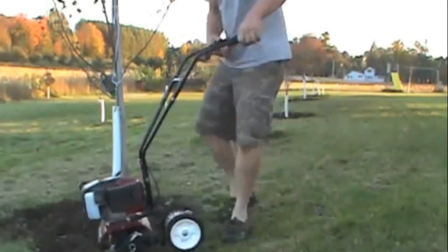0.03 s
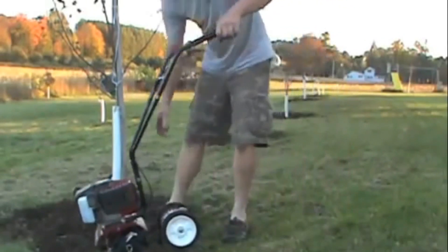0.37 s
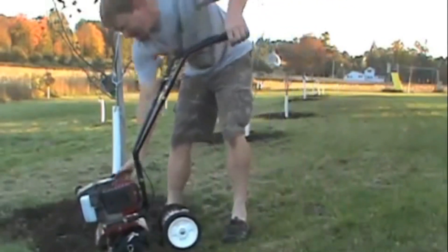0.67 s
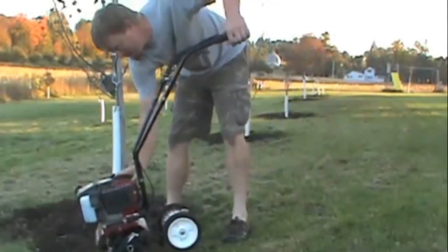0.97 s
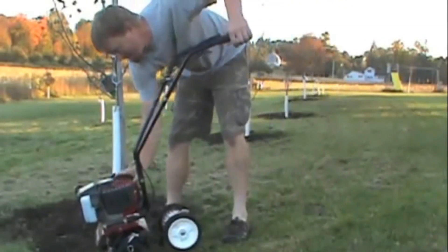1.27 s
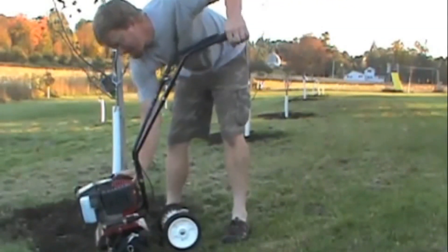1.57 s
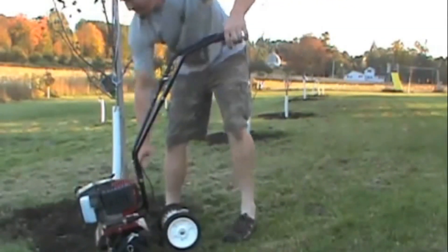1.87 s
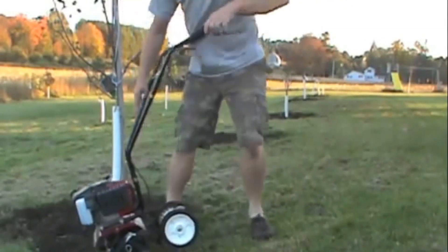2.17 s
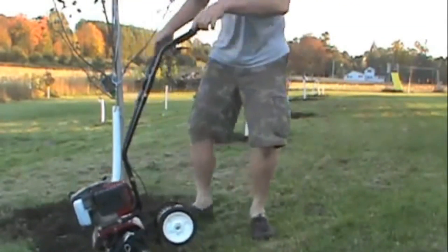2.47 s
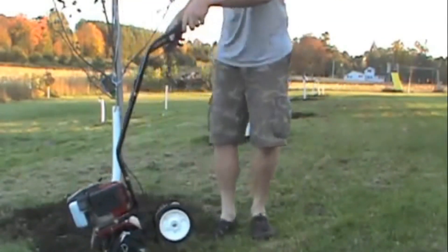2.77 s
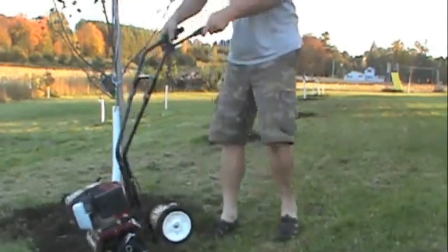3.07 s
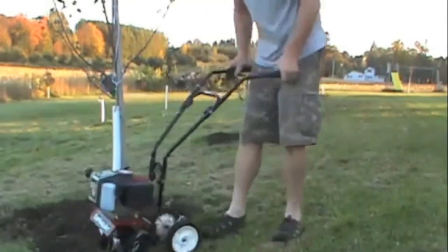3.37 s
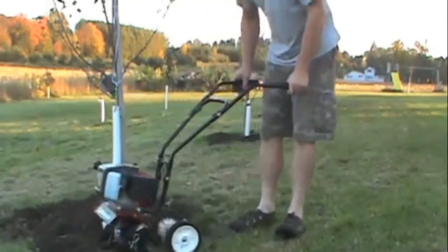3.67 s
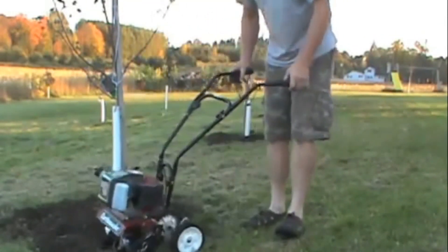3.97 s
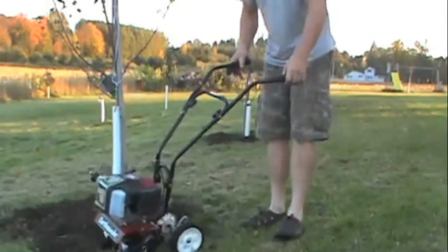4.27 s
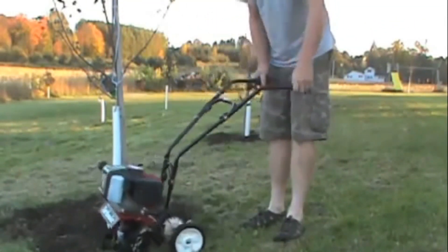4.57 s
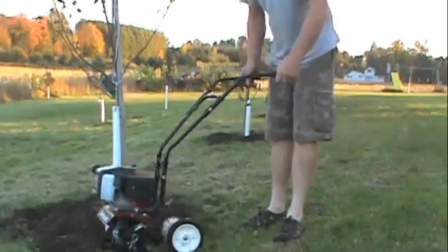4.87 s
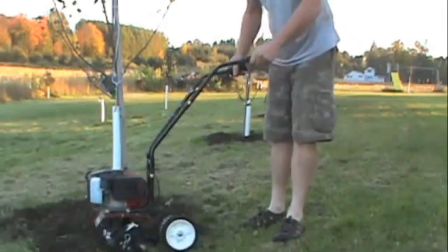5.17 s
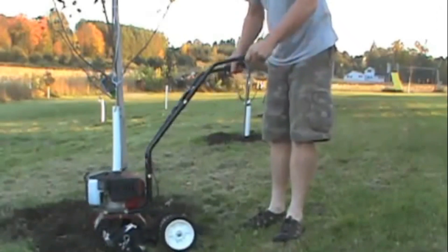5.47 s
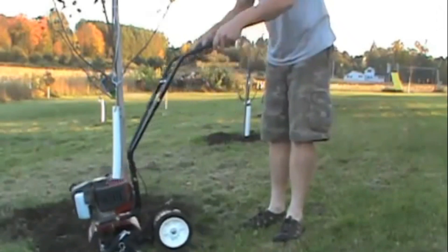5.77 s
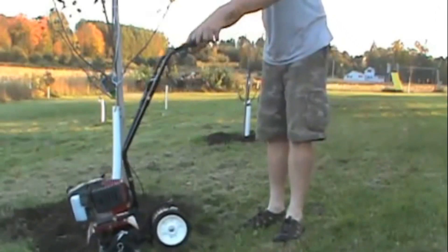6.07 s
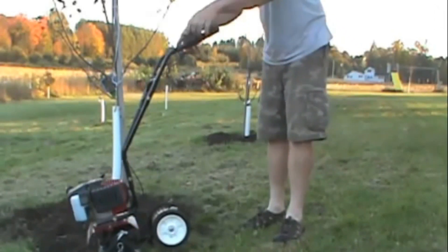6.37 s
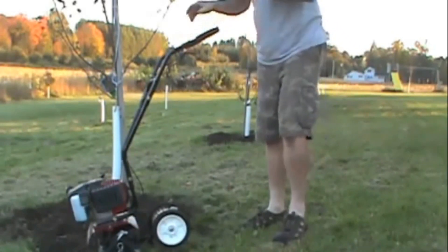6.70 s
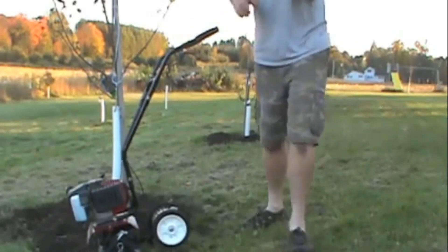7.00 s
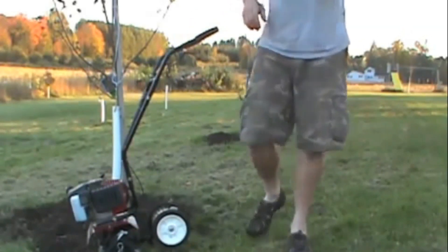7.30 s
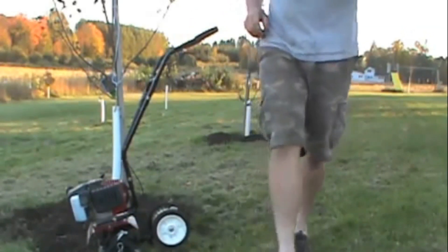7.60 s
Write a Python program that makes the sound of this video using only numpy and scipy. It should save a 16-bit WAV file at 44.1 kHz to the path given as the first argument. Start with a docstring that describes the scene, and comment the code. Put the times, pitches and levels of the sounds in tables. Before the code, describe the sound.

A small petrol tiller runs fast, then sputters to a stop; metal parts click and knock as it is dragged through soil, then faint footsteps.

```python
"""On a lawn, a small petrol tiller runs fast and unevenly, its firings barking through the silencer.
Switched off, it chugs to a stop on its last compressions, with a dry squeak and a last kick.
It is dragged back through crumbling soil, loose steel parts click and the tine guard knocks;
then someone steps away, shoes brushing the grass. Far engines and tyres murmur behind."""
import sys
import numpy as np
from scipy import signal
from scipy.fft import rfft, irfft
from scipy.io import wavfile
from scipy.ndimage import uniform_filter1d

SR = 44100
rng = np.random.default_rng(int(sys.argv[2]) if len(sys.argv) > 2 else 0)


def inscribe(sig):
    """Save sig as 16-bit PCM at rate SR to the path in sys.argv[1].

    A 1-D sig is mono; a 2-D sig holds one channel per row.
    Samples are clipped to [-1, 1] before scaling.
    """
    pcm = np.round(np.clip(np.atleast_2d(sig).T, -1, 1) * 32767)
    wavfile.write(sys.argv[1], SR, pcm.astype(np.int16))


N = 345788
TIME = np.arange(N) / SR


# time_s, strokes_per_s
CRANK_SPEED = [(0, 69.5), (.12, 69.8), (.3, 72), (.45, 72.5), (.7, 72.4), (.95, 73.3), (1.2, 75),
               (1.38, 74), (1.5, 70.5), (1.6, 64.5), (1.7, 55), (1.77, 48.5), (1.85, 41.5), (1.92, 38),
               (1.986, 32)]

def crank():
    """Stroke rate and running stroke count, which reaches zero at the last quick stroke."""
    speed, = in_time(CRANK_SPEED)
    count = np.cumsum(speed) / SR
    return speed, count - np.interp(CRANK_SPEED[-1][0], TIME, count)


# time_s, level_db, firing_strength_0_1
COMBUSTION = [(0, -2, 0.91), (.3, -3.5, 0.72), (.55, -3, 0.91), (.9, -4, 0.96), (1.42, -3, 0.83),
              (1.52, -1.5, 0.1), (1.75, -3, 0.09), (2.0, 1.5, 0.03)]

def strokes(jitter_s=.00012, stumble_s=.0015, miss_share=.3, slip_share=.55):
    """Lightly loaded, the engine fires in short runs, misses, and often slips half a stroke."""
    speed, count = crank()
    countdown = np.arange(int(-count[0]))
    build_up, stumble, jitter = rng.standard_normal((len(countdown), 3)).T
    # spent gas builds up until a stroke fails to light
    spent_gas = np.cumsum(np.clip(miss_share * (1 + .35 * build_up), .05, .6))
    missed = np.diff(np.floor(spent_gas), prepend=0) > 0
    lit = in_time(COMBUSTION, np.interp(-countdown, count, TIME))[1] > .5
    slips = missed & lit & (rng.random(len(countdown)) < slip_share)
    position = -countdown - .5 * np.cumsum(slips) + .25 * slips
    keep = position > count[0]
    times = np.interp(position, count, TIME)
    firing = in_time(COMBUSTION, times)[1]
    times += firing * (jitter_s * jitter + stumble_s * missed * stumble)
    return times[keep], np.interp(times, TIME, speed)[keep], (firing * ~missed)[keep]


# pitch_hz, width_hz, gain_db
SILENCER_RESONANCES = [(80, 57, -18), (172, 63, 4.5), (301, 112, 1), (376, 160, -7), (467, 28, 5),
                       (540, 120, 3.5), (930, 250, 4.5), (1087, 121, 4.5), (1493, 62, -23)]

def exhaust(times, speed, fired, round_trip_s=.004562, jitter_s=.00025):
    """Firings crack, spit hot gas and bounce once through the silencer; misses mostly pump air."""
    level_db, power = in_time(COMBUSTION, times)
    size_dev, trip_dev, bark_dev, bounce_dev, length_dev = rng.standard_normal((len(times), 5)).T
    size = from_db(level_db + .8 * size_dev)
    bounce_s = times + round_trip_s + jitter_s * power * trip_dev
    bark = size * (fired * from_db(.5 + 1.1 * bark_dev) + (1 - fired) * from_db(-7))
    bounce = from_db(np.minimum(-8 + 2 * bounce_dev, -4))
    blows = impulses(times, bark) + impulses(bounce_s, bark * bounce)
    turbulence = decays(times, to_db(bark * (.5 + .5 * fired)) - 29, t60_s=.05) * rng.standard_normal(N)
    ringing = from_db(17.5) * resonate(blows + turbulence, SILENCER_RESONANCES)
    crack = from_db(15) * port_crack(times - .0002, size * (1 - power + .68 * fired))
    muffled = signal.sosfilt(signal.butter(3, 1900, fs=SR, output="sos"), ringing + crack)

    puff_s = .002915 * (65 / speed) ** .27 * (1 - .038 * power) * (1 + .059 * length_dev)
    pumped = size * (from_db(-10) * (1 - fired) + from_db(-24) * fired)
    air = puffs(times + .00036, pumped, puff_s, width=.59, skew_rad=.2)
    air += puffs(times + 1.23 * puff_s, from_db(-4.5 + 3 * power) * pumped, puff_s, width=1)
    air += puffs(times + 2.032 * puff_s, from_db(-7 + 3 * power) * pumped, puff_s, width=.35)
    air += puffs(bounce_s + .00031, from_db(-18) * size * fired, puff_s, width=.27)
    spit = decays(times, to_db(size * fired) - 30.5, t60_s=.015)
    return muffled + air + spit * (noise(1700, 2400) + from_db(-2) * noise(5400, 13000))


def port_crack(times, sizes, gap_s=.00074):
    """The exhaust port opens with a double crack, whose spacing hollows the middle tones."""
    cracks = impulses(times, sizes) + impulses(times + gap_s, .7 * sizes)
    return band(cracks, 670, 1690)


def puffs(times, sizes, periods_s, width, skew_rad=0):
    """Air pumped through a port: suck, push, suck."""
    out, t = np.zeros(N), np.arange(-SR // 50, SR // 50) / SR
    for s, size, period_s in zip(times, sizes, periods_s):
        if s + t[0] > 0:
            window = np.exp(-(t / period_s / width) ** 2)
            add(out, s + t[0], size * window * np.cos(2 * np.pi * t / period_s + skew_rad))
    return out


# stroke_harmonic, level_db, honk_gain_db
DRONE_HARMONICS = [(1, -57, 11), (2, -48.5, 9), (4, -31, 2), (5, -30.5, -7), (6, -30, 3.5),
                   (8, -43.5, 13.5), (9, -42.5, 12.5), (11, -36.5, 8), (12, -43, 2), (15, -33, 1.5),
                   (20, -35.5, 0)]

def drone():
    """The even part of the firing: wavering harmonics, most of which swell as the intake honks."""
    count = crank()[1]
    level_db, firing = in_time(COMBUSTION)
    honk = swell(start_s=.42, length_s=.27, db=0, attack_s=.02, release_s=.094)
    tones = 0
    for harmonic, db, honk_db in DRONE_HARMONICS:
        gain = from_db(db + honk * honk_db + 1.8 * drift(11))
        tones += gain * np.cos(2 * np.pi * harmonic * count + .42 * drift(7))
    ignition = np.interp(TIME, [1.42, 1.6], [1, 0])
    return np.sqrt(2) * from_db(level_db) * firing ** .99 * ignition * tones


# stroke_harmonic, level_db
WHIR_HARMONICS = [(4, -36), (5, -32.5), (6, -38.5), (7, -35.5), (16, -42), (18, -37), (20, -38.5),
                  (23, -38.5)]

def whir():
    """With the spark cut, the crank coasts and its harmonics glide down."""
    count = crank()[1]
    tones = sum(from_db(db + 1.5 * drift(11)) * np.cos(2 * np.pi * harmonic * count)
                for harmonic, db in WHIR_HARMONICS)
    return np.sqrt(2) * swell(start_s=1.463, length_s=.2, db=0, attack_s=.029, release_s=.095) * tones


# start_s, level_db, period_s, hiss_db
LAST_COMPRESSIONS = [(2.019, -15, 0.0043, -27), (2.027, -7.5, 0.005, -37), (2.058, -7, 0.0052, -29),
                     (2.099, -9.5, 0.0052, -25.5), (2.138, -10, 0.0061, -25), (2.198, -9, 0.0071, -25.5),
                     (2.269, -11.5, 0.00585, -28.5), (2.346, -14.5, 0.005, -34), (2.542, -11, 0.004, -26),
                     (2.58, -19, 0.0091, -39)]
# start_s, length_s, level_db
PISTON_SIGHS = [(2.29, 0.017, -33.5), (2.41, 0.022, -41), (2.478, 0.043, -42.5)]

def run_down():
    """The piston labours, rocks and kicks back; air sighs and rings hollow in the silencer."""
    s, db, period_s, hiss_db = np.transpose(LAST_COMPRESSIONS)
    air = puffs(s, from_db(db), period_s, width=.49, skew_rad=.42)
    air += puffs(s + 2.183 * period_s, from_db(db - 6), period_s, width=.16, skew_rad=.79)
    air += from_db(17.5) * port_crack(s, from_db(db) * (s < 2.15))
    sighs = swells(PISTON_SIGHS, attack_s=.0051, release_s=.0037)
    ring = uniform_filter1d(decays(s, .5 * db - 14.5, t60_s=.061), SR // 200)
    hollow = (ring + sighs) * noise(206, 394)
    leak = uniform_filter1d(decays(s - .004, hiss_db, t60_s=.065), SR // 250)
    leak *= noise(710, 1770) + from_db(-6) * noise(2880, 14000)
    return band(air, 110, 4000, order=1) + hollow + leak


# pitch_hz, level_db, t60_s
CASING_MODES = [(1138, 9.5, 0.019), (1245, 13, 0.027), (1510, 9, 0.03), (1704, 5.5, 0.06),
                (1852, 8.5, 0.05), (1905, 6.5, 0.042), (2290, 13, 0.0165), (2534, 3, 0.069),
                (2684, -11, 0.036), (2930, 2, 0.0076), (3000, -4.5, 0.015), (3530, -3.5, 0.068),
                (3760, -3.5, 0.082), (5400, 0, 0.027)]
# start_s, level_db
DRIVE_JOLTS = [(2.279, -35), (2.342, -44), (2.381, -40.5), (2.469, -34.5), (2.529, -32)]

def casing_clatter(beats, speed, surge, knee_per_s=30):
    """Piston, clutch and gears rattle the casing; slack in the slowing drive jolts it."""
    contacts = np.r_[beats, rng.uniform(0, 2.62, size=700)]
    rattle = strike(contacts, 4 * rng.standard_normal(len(contacts)), CASING_MODES, spread_db=3.5)
    rattle = band(rattle, 950, 12000)
    rattle /= np.sqrt(np.abs(uniform_filter1d(rattle ** 2, SR // 14)) + 1e-6)
    rasp = from_db(-4) * surge * noise(2070, 3150)
    running = from_db(-32) * (1 - np.exp(-(speed / knee_per_s) ** 2.07))
    jolt_s, jolt_db = np.transpose(DRIVE_JOLTS)
    jolts = uniform_filter1d(decays(jolt_s, jolt_db, t60_s=.083), SR // 150)
    return (running + jolts) * (rattle + rasp)


# freq_hz, density_db
FAN_SPECTRUM = [(3600, 5.5), (4100, -3), (4700, -2.5), (5500, 3.5), (6300, 4), (7200, 1.5), (8400, -3.5),
                (9500, 2), (10600, 4.5), (13000, -3.5), (16000, -9.5)]
# start_s, length_s, level_db
MIXTURE_RUSHES = [(1.5, 0.18, -32), (1.842, 0.0036, -25.5), (2.53, 0.0041, -36)]

def fan_and_ports(speed, surge, db_per_octave=5):
    """Fan and ports hiss less as the speed falls; unburnt mixture rushes through."""
    flow = from_db(-37 + db_per_octave * np.log2(speed / speed.max() + 1e-12))
    rushes = swells(MIXTURE_RUSHES, attack_s=.0022, release_s=.0091)
    hiss = colour(rng.standard_normal(N), FAN_SPECTRUM) * surge * from_db(2 * drift(250))
    return np.hypot(flow, rushes) * hiss


# pitch_hz, level_db, t60_s
FIN_MODES = [(2480, -1.5, 0.073), (2760, 1, 0.081), (3470, -8, 0.12), (3640, -6.5, 0.11),
             (5080, -11.5, 0.11), (5920, -12.5, 0.2), (5550, -4, 0.095)]

def cooling_fins(beats):
    """The fins ring on after each compression of the coasting engine."""
    return strike(beats[(beats > 1.5) & (beats < 2.418)], -36.5, FIN_MODES, spread_db=2.5)


def mechanism(times, standstill_s=2.586):
    """Metal clatter and air hiss, both fluttering with the strokes."""
    speed, = in_time(CRANK_SPEED + [(standstill_s, 0)])
    beats = np.r_[times, np.array(LAST_COMPRESSIONS)[:, 0]]
    surge = 1 + decays(beats, .8 * rng.standard_normal(len(beats)), t60_s=.0075)
    surge /= np.sqrt(uniform_filter1d(surge ** 2, SR // 8))
    return casing_clatter(beats, speed, surge) + cooling_fins(beats), fan_and_ports(speed, surge)


# start_s, level_db, treble_db, pitch_hz
ENGINE_TICKS = [(0.049, -19.5, -50.5, 2990), (.111, -23.5, -45, 3060), (.231, -36, -49, 3040),
                (0.246, -29.5, -39, 2970), (0.2844, -20, -31.5, 3020), (.3373, -19.5, -32, 3020),
                (0.3905, -19, -24.5, 2940), (0.55, -20.5, -38, 3060), (.7504, -27, -30.5, 2680),
                (0.814, -21.5, -25, 2960), (0.8287, -18.5, -27, 3150), (1.073, -19, -27.5, 3180),
                (1.147, -25, -25, 3660), (1.4498, -15.5, -26.5, 3110), (1.513, -12.5, -22, 2410),
                (1.662, -19.5, -27, 5500)]

def engine_ticks():
    """A loose metal part snaps against the running engine."""
    s, db, treble_db, hz = np.transpose(ENGINE_TICKS)
    ring = pings(s, db - 3, hz, t60_s=.022, partials_db=-19, spread_octaves=.28)
    return ring + decays(s, treble_db, t60_s=.02) * noise(3500, 14000)


# start_s, length_s, level_db, peak_fraction
DRIVE_SQUEAKS = [(2.313, 0.025, -35, .65), (2.418, 0.026, -34, .45), (2.453, 0.069, -32, 0.24)]

def drive_squeaks(top_hz=9430, sag_hz_per_s=23000, fade_db=21):
    """Dry rubbing in the slowing drive; pitch and level arch as the pressure comes and goes."""
    out, waver_hz = np.zeros(N), 70 * drift(450)
    for s, length_s, db, peak in DRIVE_SQUEAKS:
        along = (TIME - s) / length_s
        slack = ((np.clip(along, 0, 1) - peak) / max(peak, 1 - peak)) ** 2
        gate = np.clip(8 * np.minimum(along, 1 - along), 0, 1)
        hz = top_hz - sag_hz_per_s * length_s * slack + waver_hz
        out += gate * from_db(db - fade_db * np.sqrt(slack)) * np.sin(phase(hz))
    return out


# start_s, level_db, brightness_db, pitch_hz
STEEL_CLICKS = [(2.8572, -34.5, -5, 10100), (2.908, -44.5, -7, 14300), (3.0, -40.5, 0, 7470),
                (3.052, -33.5, 2, 9900), (3.103, -37, -2, 10700), (3.127, -39.5, 1, 11300),
                (3.233, -39.5, -1, 10600), (3.336, -42, -5, 4100), (3.901, -41.5, 1, 7050),
                (3.958, -43, 2, 11400), (4.1935, -46.5, -2, 13100), (4.316, -41, -8.5, 6800),
                (4.339, -49, 5, 9000), (4.396, -28.5, -1.5, 6780), (4.4466, -44.5, -2, 14000),
                (4.719, -41, 1.5, 9800), (4.998, -39.5, -1, 7500), (5.066, -41, -6, 2300),
                (5.1948, -51.5, 2, 13900), (5.2774, -53.5, 7, 13700), (5.309, -46, -7, 5960),
                (5.3216, -34.5, -5, 6270), (5.35, -40.5, -3, 9450), (5.387, -45, 2.5, 14100),
                (5.829, -50, -5, 2760), (6.06, -43, 0, 8600)]
# pitch_hz, level_db, t60_s
FRAME_MODES = [(2440, -7, .2), (2710, -2, 0.12), (3130, -16, 0.31), (4030, -7, 0.15), (4810, -4, 0.073),
               (5060, -13, 0.084), (6230, -5, 0.078), (6740, 0, .05), (6880, -9, 0.065), (7400, 1, 0.072),
               (9350, -6, 0.049), (10900, -14, .05), (11700, -6, .05), (14200, -16.5, .06)]

def steel_clicks(buzz_t60_s=.038):
    """Handle, levers and tines snap together: a short contact buzz, then the frame rings."""
    s, db, bright_db, hz = np.transpose(STEEL_CLICKS)
    buzz = decays(s, db - 16, buzz_t60_s) * noise(5000, 7400)
    buzz += decays(s, db - 17 - bright_db, 2.5 * buzz_t60_s) * noise(2000, 3700)
    buzz += decays(s, db + 1 + bright_db, buzz_t60_s) * noise(9400, 13200)
    frame = strike(s, db - 15.5, FRAME_MODES, spread_db=4.5)
    return buzz + frame + pings(s, db - 2.5, hz, t60_s=.035, partials_db=-10.5, spread_octaves=.96)


# start_s, level_db, thud_db, pitch_hz, t60_s
GUARD_KNOCKS = [(2.538, -15, -49, 950, 0.035), (3.161, -43.5, -72, 1840, 0.17),
                (3.283, -39, -72, 1452, 0.3), (3.295, -38.5, -68, 2200, 0.11),
                (3.392, -38, -58, 1135, 0.11), (3.414, -33, -71, 2040, .03),
                (3.424, -35.5, -73, 2590, 0.044), (3.434, -37, -39, 2870, .03),
                (3.475, -44, -48, 2010, .05), (3.557, -28.5, -70, 1235, 0.06), (3.624, -29, -75, 1157, 0.1),
                (3.675, -29, -60, 1160, 0.049), (3.847, -33.5, -51, 2790, 0.071),
                (4.539, -39, -55, 1370, 0.11), (4.649, -41, -61, 3000, 0.024),
                (4.74, -42, -52, 2010, 0.046), (5.011, -36, -40, 2020, .035),
                (5.065, -35.5, -48, 2350, 0.041), (5.469, -41, -65, 2380, 0.042)]
# pitch_hz, level_db, t60_s
GUARD_MODES = [(588, -13, 0.24), (776, -10.5, 0.12), (876, -12.5, 0.098), (1153, -19.5, 0.21),
               (1420, -9, 0.092), (1610, -5, 0.027), (2170, 2.5, 0.031), (2314, 4, 0.011),
               (2580, -1, 0.019), (3070, -10, 0.055), (3700, -10, 0.023)]

def guard_knocks(chatter_s=.00512):
    """The last kick, wheels and clods bump the tine guard, which chatters over a thud of earth."""
    s, db, thud_db, hz, t60_s = np.transpose(GUARD_KNOCKS)
    crunch = decays(s, db - 16, t60_s=.04) * noise(900, 3000)
    thud_hz = rng.uniform(293, 464, len(s))
    thud = pings(s, thud_db, thud_hz, t60_s=.069, partials_db=-20, spread_octaves=.5)
    contacts = s[:, None] + chatter_s * rng.random((len(s), 3))
    body = strike(contacts.ravel(), np.repeat(db - 18, 3), GUARD_MODES, spread_db=3)
    ring = pings(s, db - 7, hz, t60_s, partials_db=-18, spread_octaves=.9)
    return body + ring + crunch + thud


# start_s, length_s, soil_db, grass_db
TILLER_DRAGS = [(2.583, 0.24, -57, -56), (2.82, 0.046, -50.5, -49.5), (3.135, 0.58, -45, -48.5),
                (3.263, 0.072, -55, -42), (3.797, 0.19, -44.5, -45.5), (4.294, 0.023, -50, -60),
                (4.492, 0.025, -54, -47.5), (4.69, 0.028, -50.5, -48), (5.454, 0.027, -54, -73)]
# start_s, length_s, level_db
SHOE_SWINGS = [(6.86, 0.29, -59), (7.17, 0.048, -49), (7.34, 0.053, -53), (7.74, 0.066, -49)]
# freq_hz, density_db
SOIL_SPECTRUM = [(500, 5.5), (1100, 5), (2300, 4), (4000, -4), (6000, -24)]
GRASS_SPECTRUM = [(3500, -26), (5500, -2), (8000, -2.5), (11000, 3), (14000, -0.5), (16000, -7.5)]

def soil_and_grass(attack_s=.027, release_s=.075, ticks_per_s=18):
    """Tines and wheels crumble soil and shake the frame; earth trickles; shoes brush the grass."""
    drags = np.array(TILLER_DRAGS)
    digging = swells(drags[:, [0, 1, 2]], attack_s, release_s)
    brushing = swells(drags[:, [0, 1, 3]], attack_s, release_s)
    trickle = swell(start_s=2.6, length_s=2.9, db=0, attack_s=attack_s, release_s=.45)
    shoes = swells(SHOE_SWINGS, attack_s=.034, release_s=.08)
    soil = np.hypot(digging, from_db(-55.5) * trickle) + from_db(-6) * shoes
    grass = np.hypot(brushing, from_db(-63) * trickle) + shoes
    soil *= from_db(-10 + 2.6 * drift(60)) * colour(grains(per_s=1200, spread_db=2.1), SOIL_SPECTRUM)
    grass *= from_db(-6 + 1.75 * drift(70)) * colour(grains(per_s=900, spread_db=2.7), GRASS_SPECTRUM)
    tick_s = TIME[rng.random(N) < ticks_per_s / SR]
    tick_hz = rng.uniform(1790, 7000, len(tick_s))
    ticks = pings(tick_s, -4.5, tick_hz, t60_s=.016, partials_db=-7, spread_octaves=1)
    return soil + grass + digging * ticks


# start_s, level_db
CLOD_DROPS = [(4.598, -51), (4.675, -59), (4.76, -56), (4.83, -53)]

def clods():
    """Lumps of earth drop off the tines with a soft thud."""
    s, db = np.transpose(CLOD_DROPS)
    return decays(s, db, t60_s=.18) * noise(310, 500)


# start_s, level_db
SHOE_LANDINGS = [(7.057, -51.5), (7.106, -54), (7.236, -60)]

def footfalls(sole_hz=714, width_hz=220):
    """Heel and sole land on turf with a dull pat and a little crunch."""
    s, db = np.transpose(SHOE_LANDINGS)
    pat = from_db(-1) * rms_one(resonate(rng.standard_normal(N), [(sole_hz, width_hz, 0)]))
    crunch = from_db(-5.5) * noise(380, 1500)
    return decays(s, db, t60_s=.18) * (pat + crunch)


# start_s, length_s, level_db, release_s, low_hz, high_hz
FAR_VEHICLES = [(1.59, 4.9, -63.5, 0.83, 68, 165), (1.894, 11, -68, 0.88, 715, 905),
                (5.94, 0.45, -64, 0.27, 724, 850)]

def traffic(rise_s=.23, idle_start_s=6.55, idle_hz=91):
    """Far engines drone and tyres sigh; near the end one engine hums at idle."""
    vehicles = sum(swell(s, length_s, db, rise_s, release_s) * noise(low_hz, high_hz)
                   for s, length_s, db, release_s, low_hz, high_hz in FAR_VEHICLES)
    hum = np.sqrt(2) * np.sin(phase(idle_hz + 1.56 * drift(9.9))) * from_db(-64.5 + 2.4 * drift(3.4))
    return vehicles + np.clip((TIME - idle_start_s) / rise_s, 0, 1) * hum


# time_s, turns_per_s, level_db
MOTOR_RUN = [(2.5, 61, -75), (3.1, 48, -68), (3.9, 52, -65), (4.7, 60, -64), (5.5, 62.3, -68.5),
             (5.9, 61, -75), (6.4, 57, -95)]
# harmonic, level_db
MOTOR_HARMONICS = [(2, -2.5), (3, -3), (4, -7)]

def far_motor():
    """A far motor sags, slowly gathers speed and fades."""
    turns_per_s, level_db = in_time(MOTOR_RUN)
    angle = phase(turns_per_s + .3 * drift(15))
    return np.sqrt(2) * sum(from_db(level_db + db + 2.5 * drift(6)) * np.sin(harmonic * angle)
                            for harmonic, db in MOTOR_HARMONICS)


# start_s, length_s, level_db
FAR_WHISTLES = [(5.08, .2, -74), (5.77, 0.19, -72)]

def far_whistle(pitch_hz=3860):
    """A thin, wavering whistle comes twice."""
    tone = np.sqrt(2) * np.sin(phase(pitch_hz + 35 * drift(120)))
    return swells(FAR_WHISTLES, attack_s=.05, release_s=.04) * tone


# freq_hz, density_db
CENTRE_AIR = [(12, -10), (20, 4.5), (107, .5), (285, -9.5), (513, -9.5), (678, -11), (738, -7.5),
              (1030, -10), (1960, -15), (4670, -19), (12100, -18.5), (14700, -21), (16000, -18.5)]
SIDE_AIR = [(260, -6), (800, -1), (2000, -5), (5000, -13.5), (9000, -23), (16000, -25.5)]

def open_air():
    """Outdoor hush: a central part and a fainter one that differs between the ears."""
    centre = from_db(-59) * colour(rng.standard_normal(N), CENTRE_AIR)
    side = from_db(-66) * colour(rng.standard_normal(N), SIDE_AIR)
    return centre, side * [[1], [-1]]


def echoes(x, t60_s=.92, delay_s=.02):
    """Trees and ground scatter back a faint dull tail, different in each ear."""
    age = np.arange(SR) / SR
    tails = band(rng.standard_normal((2, SR)), 300, 1600) * from_db(-60 * age / t60_s) * (age > delay_s)
    tails /= np.linalg.norm(tails, axis=1, keepdims=True)
    return from_db(-33) * signal.fftconvolve(x[None], tails, axes=1)[:, :N]


def treble_spread(x, side_db):
    """A faint treble spread, different in each ear, widens the chugs, squeaks and clicks."""
    smear = rng.standard_normal(SR // 250)
    treble = signal.fftconvolve(band(x, 2500, 16000), smear / np.linalg.norm(smear))[:N]
    return from_db(side_db) * treble * [[1], [-1]]


def place_left(x, side_db):
    """Stereo, with the middle frequencies louder on the left."""
    side = from_db(side_db) * band(band(x, 221, 3600)[::-1], 200, 3000)[::-1]
    return np.array([x + side, x - side])


def from_db(db):
    """Decibels to gain."""
    return 10 ** (np.asarray(db) / 20)


def to_db(gain):
    """Gain to decibels."""
    return 20 * np.log10(np.abs(gain) + 1e-6)


def rms_one(x):
    """Scale to rms 1."""
    return x / np.sqrt(np.mean(x ** 2) + 1e-20)


def phase(hz):
    """Running phase in radians."""
    return 2 * np.pi * np.cumsum(hz) / SR


def in_time(rows, at=TIME):
    """Interpolate each column against the first."""
    s, *columns = np.transpose(rows)
    return [np.interp(at, s, column) for column in columns]


def band(x, low_hz, high_hz, order=2):
    """Butterworth band-pass."""
    sos = signal.butter(order, [low_hz, high_hz], "band", fs=SR, output="sos")
    return signal.sosfilt(sos, x + 1e-18)


def noise(low_hz, high_hz):
    """Band noise, rms 1."""
    return rms_one(band(rng.standard_normal(N), low_hz, high_hz))


def drift(rate_hz):
    """Random wander, rms 1."""
    return rms_one(np.interp(TIME * rate_hz, np.arange(4000), rng.standard_normal(4000)))


def grains(per_s, spread_db):
    """Tiny snaps of uneven size over a fine hiss."""
    sizes = from_db(spread_db * np.minimum(rng.exponential(1, N), 4.5)) * rng.choice([-1, 1], N)
    return rms_one(sizes * (rng.random(N) < per_s / SR)) + .45 * rng.standard_normal(N)


def colour(x, spectrum):
    """Apply a spectrum, rolled off below its first point; rms 1."""
    hz, db = np.transpose(spectrum)
    bins_hz = np.arange(N // 2 + 1) * SR / N + 1
    gain = from_db(np.interp(np.log(bins_hz), np.log(hz), db)) * np.minimum(bins_hz / hz[0], 1) ** 2
    return rms_one(irfft(rfft(x) * gain, N))


def resonate(x, resonances):
    """Parallel two-pole resonances."""
    out = 0
    for hz, width_hz, db in resonances:
        radius = np.exp(-np.pi * width_hz / SR)
        poles = [1, -2 * radius * np.cos(2 * np.pi * hz / SR), radius ** 2]
        out += from_db(db) * (1 - radius ** 2) / 2 * signal.lfilter([1, 0, -1], poles, x + 1e-18)
    return out


def impulses(times, sizes):
    """One sample per contact."""
    out = np.zeros(N)
    np.add.at(out, np.clip(np.round(times * SR).astype(int), 0, N - 1), sizes)
    return out


def add(out, start_s, sound):
    """Mix in a short sound."""
    i = int(np.clip(start_s * SR, 0, N - len(sound)))
    out[i:i + len(sound)] += sound


def decays(times, db, t60_s):
    """An envelope that jumps at each contact and dies away."""
    out, age = np.zeros(N), np.arange(SR // 4) / SR
    for s, level_db in np.broadcast(times, db):
        add(out, s, from_db(level_db - 60 * age / t60_s))
    return out


def strike(times, db, modes, spread_db):
    """Each blow rings every mode with a random strength."""
    out = 0
    for hz, mode_db, t60_s in modes:
        radius, angle = from_db(-60 / (t60_s * SR)), 2 * np.pi * hz / SR
        poles = [1, -2 * radius * np.cos(angle), radius ** 2]
        blows = impulses(times, from_db(db + mode_db + spread_db * rng.standard_normal(len(times))))
        out += signal.lfilter([0, np.sin(angle)], poles, blows + 1e-18)
    return out


def pings(times, db, pitches_hz, t60_s, partials_db, spread_octaves, partial_t60_s=.057):
    """A struck part rings at its own pitch among six weaker, random partials."""
    out, age = np.zeros(N), np.arange(SR // 4) / SR
    for s, level_db, hz, ring_s in np.broadcast(times, db, pitches_hz, t60_s):
        octaves, strength, life = rng.uniform(-1, 1, (3, 6, 1))
        partial_hz = np.minimum(hz * 2 ** (spread_octaves * octaves), .45 * SR)
        envelopes = from_db(partials_db + 2.6 * strength - 60 * age / (partial_t60_s * 2 ** life))
        partials = envelopes * np.sin(2 * np.pi * partial_hz * age)
        main = from_db(-60 * age / ring_s) * np.sin(2 * np.pi * hz * age)
        add(out, s, from_db(level_db) * (main + partials.sum(axis=0)))
    return out


def swell(start_s, length_s, db, attack_s, release_s):
    """Rise, hold and release envelope."""
    age = TIME - start_s
    return from_db(db) * np.clip(age / attack_s, 0, 1) * np.exp(-np.maximum(age - length_s, 0) / release_s)


def swells(rows, attack_s, release_s):
    """Swells summed by power."""
    return np.sqrt(sum(swell(*row, attack_s, release_s) ** 2 for row in rows))


def scene():
    """The engine stands a little to the left; the rest is near the middle."""
    times, speed, fired = strokes()
    clatter, hiss = mechanism(times)
    rumble = from_db(-31) * noise(48, 202) * np.interp(TIME, [1.8, 2.5], [1, 0])
    chugs, squeaks = run_down(), drive_squeaks()
    engine = exhaust(times, speed, fired) + drone() + whir() + chugs + clatter + engine_ticks()
    engine = place_left(engine, side_db=-15.5)
    handling = steel_clicks() + guard_knocks() + soil_and_grass() + clods() + footfalls()
    air, diffuse_air = open_air()
    background = traffic() + far_motor() + far_whistle() + air
    middle = place_left(hiss + rumble + squeaks + handling + background, side_db=-34)
    spread = treble_spread(chugs + squeaks, side_db=-24) + treble_spread(handling, side_db=-28.5)
    return engine + middle + spread + echoes(engine.mean(axis=0)) + diffuse_air


def record(dry, low_cut_hz=18, high_cut_hz=16000):
    """The microphone thins the deepest bass; peaks are rounded and the top is cut steeply."""
    thinned = signal.sosfilt(signal.butter(1, low_cut_hz, "high", fs=SR, output="sos"), dry)
    return signal.sosfilt(signal.ellip(12, .2, 100, high_cut_hz, fs=SR, output="sos"), np.tanh(thinned))


dry = scene()
out = record(dry)
inscribe(out)
```